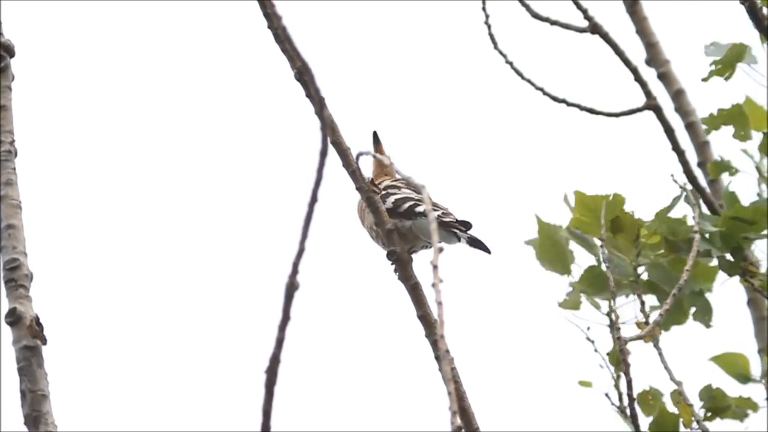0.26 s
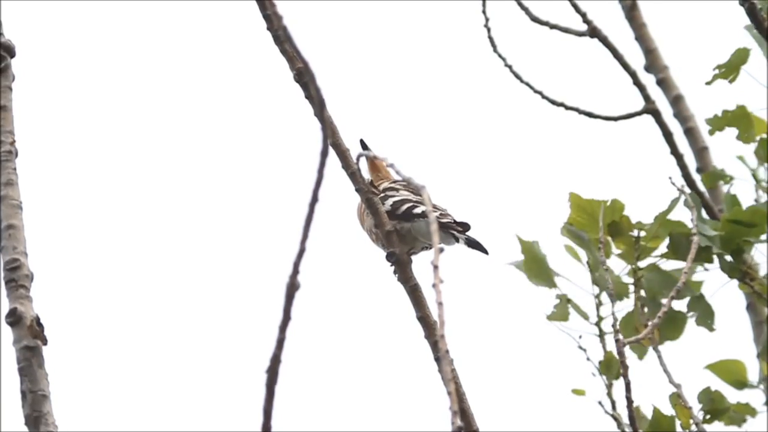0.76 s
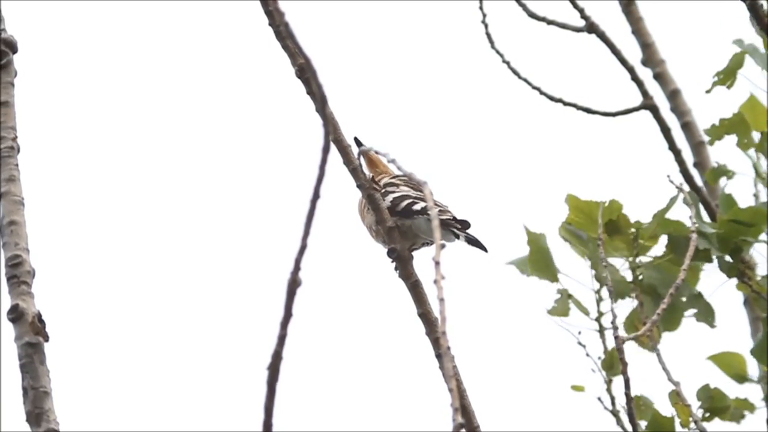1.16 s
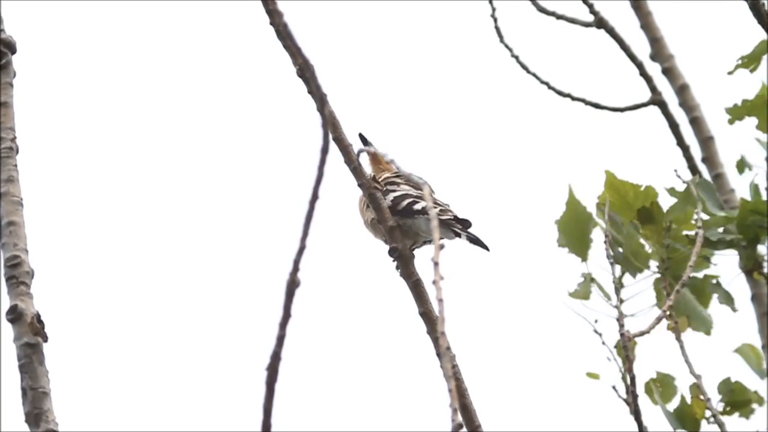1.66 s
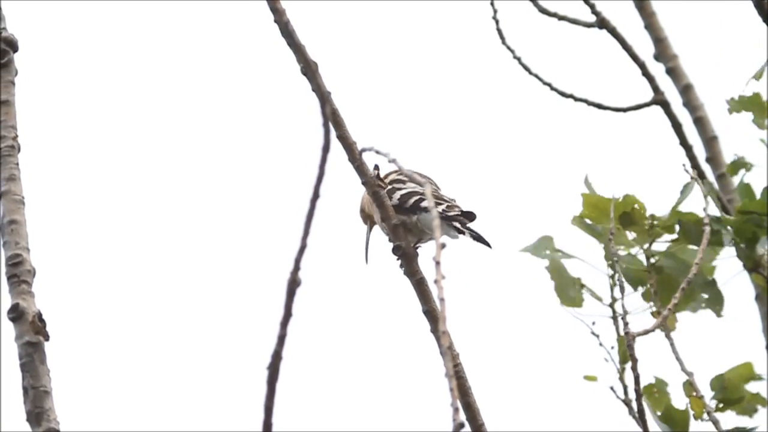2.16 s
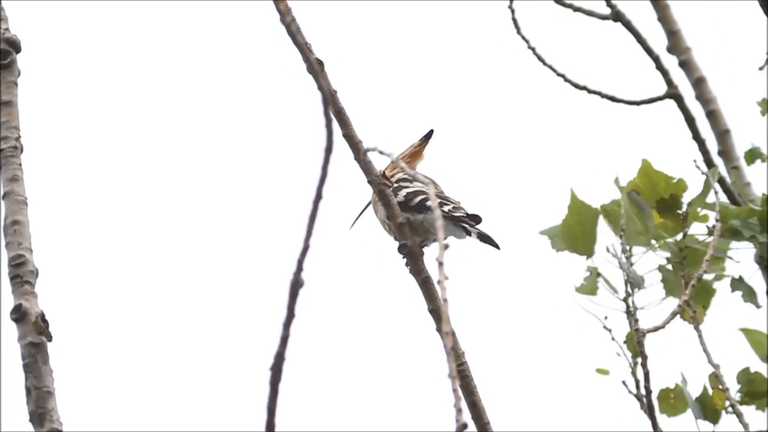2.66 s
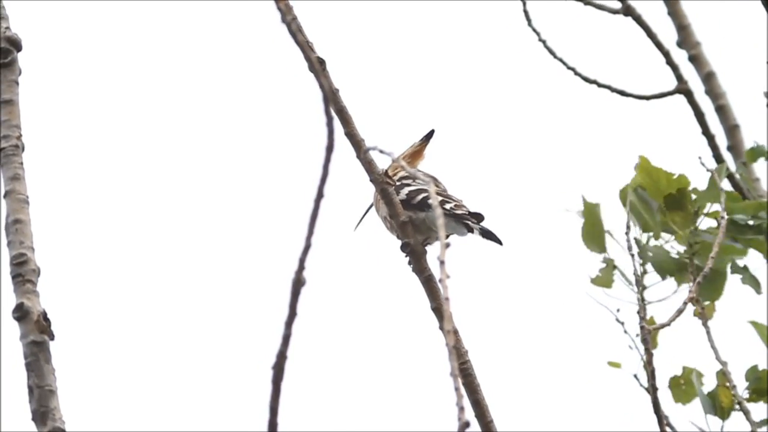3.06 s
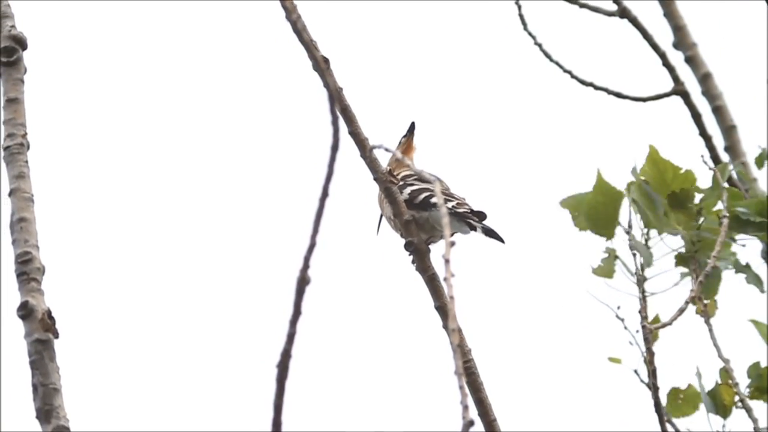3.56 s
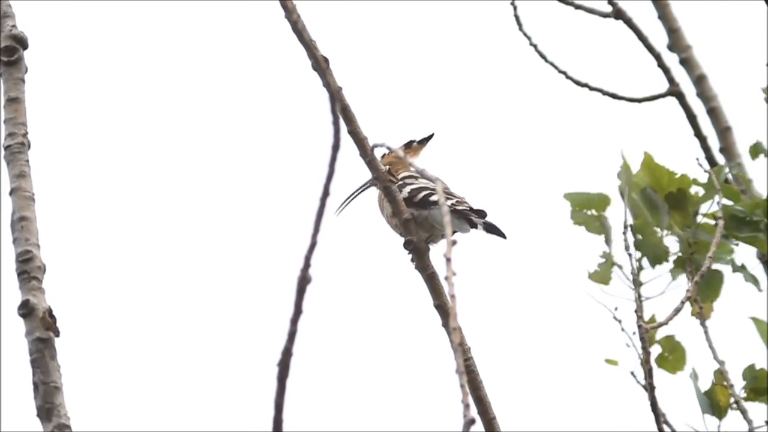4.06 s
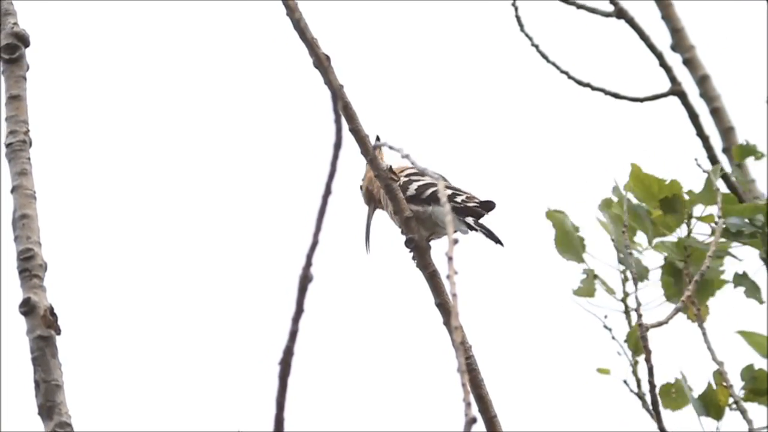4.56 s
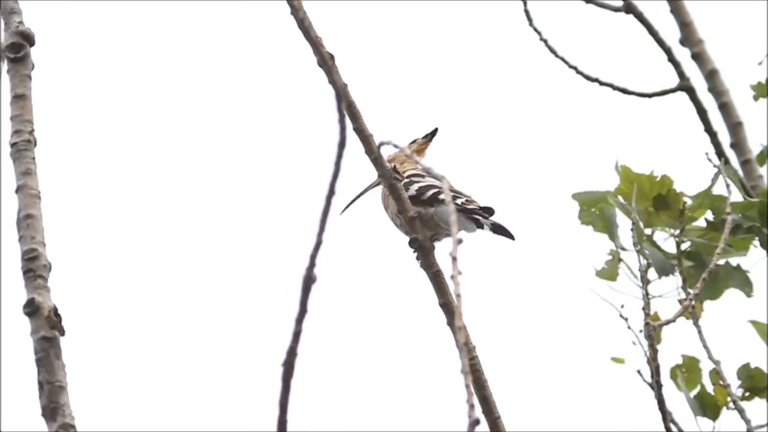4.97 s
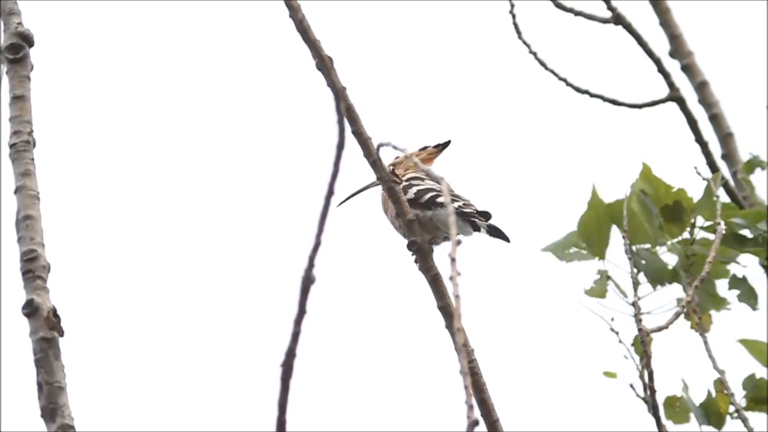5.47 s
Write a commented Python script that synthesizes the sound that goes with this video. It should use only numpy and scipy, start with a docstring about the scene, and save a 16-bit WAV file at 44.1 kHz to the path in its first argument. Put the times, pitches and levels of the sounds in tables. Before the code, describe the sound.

Soft hollow three-note hooting repeats twice outdoors among trilling, fluting and chirping birds, with faint hiss and far low rumble.

```python
"""A low traffic rumble and a faint hiss open the scene, with rough twitters and chirps far off in the trees.
A tit repeats a two-note song, a blackbird tries a few soft notes, and a small bird trills for over a second.
At two seconds a hoopoe on a branch gives three soft hoots, and three more follow later; between these calls
the blackbird flutes one phrase, and near the end a twig ticks once. Birds are trembling sines, the air is
shaped noise, the twig is damped sines; sparse decaying taps are the scatter of the trees at the microphone."""
import sys
import numpy as np
from scipy import signal
from scipy.fft import rfft, irfft
from scipy.io import wavfile
from scipy.ndimage import uniform_filter1d

SR = 44100
rng = np.random.default_rng(int(sys.argv[2]) if len(sys.argv) > 2 else 0)


def log_audio(samples):
    """Write samples as a 16-bit WAV file to the path given in sys.argv[1]."""
    # one column per channel
    frames = np.atleast_2d(samples).T
    # limit to full scale, then quantise
    limited = np.clip(frames, -1, 1)
    pcm = np.round(limited * 32767).astype(np.int16)
    wavfile.write(sys.argv[1], SR, pcm)


N = 251370  # length of the scene in samples

# Bird levels are those of the call itself, before its swell and the paths to the microphone.

# Spectrum of the far traffic and low air, relative: hz [Hz], level_db [dB per Hz]
RUMBLE_SPECTRUM = [(15, -31), (25, -21), (40, -11.5), (56, -3.5), (100, 0.5), (130, -2.5), (235, -7.5),
                   (300, -10.5), (390, -13.5), (700, -15), (1400, -18), (1820, -39), (3080, -120)]
# Spectrum of the hiss of leaves and far birds, relative: hz [Hz], level_db [dB per Hz]
HISS_SPECTRUM = [(900, -34), (1400, -2.5), (2000, -.5), (3000, 0), (4200, 1), (5200, -3), (6500, -6),
                 (9000, -8.5), (12500, -10), (15500, -16.5)]
RUMBLE_DB, HISS_DB = -56, -57  # rms at the microphone

# How long the trees hold each band: hz [Hz], t60_s [s]
TREE_DECAY = [(500, 0.61), (1500, 0.88), (4000, 0.76), (10000, 0.88)]

# Nearest rough twitters: start_s [s], length_s [s], level_db [dB], middle_pitch_hz [Hz],
# slide_hz [Hz], shake_hz [Hz, rms swing of the pitch]
ROUGH_TWITTERS = [(0, 0.1, -58, 3850, 0, 90), (.08, 0.6, -65, 2522, -10.5, 90),
                  (0.752, 0.087, -57, 3650, 332, 296), (0.789, 0.14, -56.5, 1770, 138, 158),
                  (2.228, 0.071, -58.5, 4240, -120, 80), (2.485, 0.09, -61, 2430, 70, 80),
                  (2.587, 0.07, -57.5, 2380, -310, 227), (2.721, .14, -56, 4830, -170, 230),
                  (2.746, 0.09, -61.5, 6330, -2, 497), (2.776, 0.13, -60, 3800, -300, 248),
                  (2.902, 0.071, -48, 2290, -170, 108), (3.099, 0.33, -55, 2495, 130, 75),
                  (3.483, 0.077, -48.5, 2830, -190, 109), (3.485, 0.092, -48.5, 2360, -580, 190),
                  (3.59, 0.1, -51, 3390, -400, 241), (3.828, .07, -64.5, 7530, 202, 170),
                  (4.402, 0.064, -63, 7500, 130, 200), (4.43, .065, -56.5, 3650, 2, 118),
                  (4.864, 0.12, -58.5, 3120, -165, 172), (4.98, 0.082, -61.5, 2374, 90, 101),
                  (5.158, 0.052, -53.5, 4680, 205, 121), (5.442, 0.16, -57.5, 3460, -300, 220),
                  (5.568, 0.048, -51, 2750, -100, 258), (5.642, 0.057, -52.5, 2950, 403, 280)]
# Chatter too faint to tell apart: from_s [s], to_s [s], rate [calls per s], level_db [dB],
# lowest_pitch_hz [Hz], highest_pitch_hz [Hz]
FAINT_CHATTER = [(0, 5.7, 2, -66, 2300, 4460), (3.03, 3.28, 20, -65.5, 7870, 13800)]
CHATTER_LENGTH_S, CHATTER_SHAKE_HZ = 0.061, 120  # mean length of a call; rms swing of its pitch
CHATTER_GLIDE = 0.0406  # furthest slide, as a share of the pitch
# Nearest clear chirps: start_s [s], length_s [s], level_db [dB], first_pitch_hz [Hz], last_pitch_hz [Hz]
CLEAR_CHIRPS = [(.635, 0.028, -48.5, 2554, 3520), (0.727, 0.02, -49.5, 2730, 3600),
                (1.216, 0.032, -49.5, 3545, 2257), (1.65, 0.029, -57, 3680, 2990),
                (2.467, 0.017, -54, 4500, 4530), (2.573, 0.025, -55.5, 2730, 3230),
                (2.707, 0.026, -49, 2770, 3150), (3.477, .08, -60.5, 5650, 4190),
                (3.777, 0.041, -55.5, 4590, 3970), (3.893, 0.059, -61, 5460, 4800),
                (3.996, 0.14, -56, 3150, 3060), (4.101, 0.08, -53, 3110, 3870),
                (4.588, .035, -53, 3330, 3700), (5.299, 0.044, -52, 3265, 3090)]

# The tit's two-note motif: drop_s [s, the fall to the low note], high_level_db [dB], low_level_db [dB],
# high_pitch_hz [Hz], low_pitch_hz [Hz]
TIT_SONG = [(0.303, -51, -48.5, 4220, 3800), (0.504, -51.5, -48.5, 4210, 3790),
            (4.054, -45.5, -40, 4230, 3755), (4.257, -41, -38, 4146, 3820), (4.626, -45, -38.5, 4220, 3854),
            (4.813, -43.5, -40, 4210, 3820), (5.179, -47.5, -50, 4190, 3820), (5.381, -49, -42, 4080, 3750)]
TIT_LEAD_S, TIT_HIGH_S, TIT_LOW_S = .065, 0.036, 0.047  # high note ahead of the drop; note lengths
TIT_RISE_HZ = 95  # climb of the low note

# The blackbird's short slurred notes: start_s [s], length_s [s], attack_s [s], release_s [s], level_db [dB],
# first_pitch_hz [Hz], turn_pitch_hz [Hz, at the end of the attack], last_pitch_hz [Hz]
SLURRED_NOTES = [(.275, 0.048, .015, 0.017, -62, 1750, 1756, 1840),
                 (0.446, 0.065, 0.02, .02, -60.5, 1954, 2044, 1950),
                 (0.517, 0.037, 0.016, 0.014, -53.5, 2000, 1900, 1620),
                 (0.562, 0.12, 0.042, 0.032, -54, 1500, 1635, 1505),
                 (2.728, 0.096, 0.051, 0.012, -48, 1990, 1957, 2050),
                 (2.807, 0.043, 0.012, 0.029, -42, 2015, 1910, 1850),
                 (2.875, 0.057, 0.033, 0.009, -50.5, 1830, 1684, 2040),
                 (2.89, 0.095, .045, 0.014, -43, 2635, 2133, 2150),
                 (3.002, 0.044, 0.0117, 0.0096, -46, 2300, 2154, 2145),
                 (3.027, 0.046, 0.024, 0.027, -26, 2156, 2070, 1934),
                 (3.266, 0.056, 0.0138, 0.02, -44.5, 1427, 1090, 1060),
                 (3.333, 0.055, 0.029, .012, -36.5, 1650, 1705, 1644),
                 (3.376, 0.096, .006, .016, -42.5, 1720, 1680, 1732),
                 (3.547, 0.14, 0.019, 0.035, -49.5, 1917, 1842, 1775)]
# The blackbird's one long note, with a lift near the end: time_s [s], level_db [dB], pitch_hz [Hz]
LONG_NOTE = [(3.104, -49, 1433), (3.118, -36, 1488), (3.158, -34.5, 1477), (3.218, -36, 1450),
             (3.238, -31.5, 1608), (3.25, -31.5, 1623), (3.258, -31.5, 1505), (3.268, -38, 1490)]
# The throat lets the octave through on low notes only
OCTAVE_DB, OCTAVE_BELOW_HZ, OCTAVE_DB_PER_HZ = -22.5, 1420, -0.0373

TRILL_START_S, TRILL_STEP_S = .737, .0937
TRILL_HZ, TRILL_SPREAD_HZ = 4660, 67  # mean and spread of the top of the upstrokes
TRILL_DB, TRILL_DB_PER_S = -52, 4  # mean level at the start; growth as it goes

# The hoopoe's hoots: start_s [s], length_s [s], level_db [dB], first_pitch_hz [Hz],
# last_pitch_hz [Hz, before the closing sag]
HOOPOE_HOOTS = [(2.014, 0.11, -33.5, 597, 605), (2.213, 0.11, -32.5, 586.6, 610.6),
                (2.421, 0.11, -33, 582.6, 614), (4.489, 0.11, -35, 598, 602.6),
                (4.689, 0.11, -33.7, 587, 602.4), (4.939, 0.111, -34.3, 582, 608)]
HOOT_RISE, HOOT_CUT = 0.76, 0.23  # shares of a hoot spent swelling and closing
HOOT_ONSET_DB, HOOT_END_DB = -27.5, -21  # where the swell starts from and where it closes to

# The twig's knock: peak_level_db [dB, knock alone], pitch_hz [Hz], width_hz [Hz]
TWIG_KNOCK = (-36.5, 1420, 780)
TICK_S = 5.1243
EDGE_HZ = 15720  # upper band limit of the recorder


def amp(db):
    """Decibels to gain."""
    return 10 ** (np.asarray(db) / 20)


def evened(x):
    """Scales to an rms of 1."""
    return x / np.sqrt(np.mean(x ** 2) + 1e-20)


def read(points, hz):
    """Reads a table of values over pitch along a log-frequency axis."""
    f, value = np.transpose(points)
    return np.interp(np.log(hz + 1), np.log(f + 1), value)


def add(mix, start_s, sound):
    """Mixes a sound in at its start time, cutting what runs past the end."""
    part = mix[max(round(start_s * SR), 0):][:len(sound)]
    part += sound[:len(part)]


def echo(x, delay):
    """The sound, arriving later by a longer path."""
    out = np.zeros(N)
    add(out, delay, x)
    return out


def trees(x, delay, build):
    """Scatter from trunks and leaves: sparse taps that build up, each band dying at its own speed."""
    spacing = 20  # samples: one tap falls at chance within each
    at = np.arange(0, SR - spacing, spacing)
    taps = np.zeros(SR)
    taps[at + rng.integers(0, spacing, len(at))] = rng.choice([-1., 1.], len(at))
    hz, t, bands = signal.stft(taps, SR, nperseg=256)
    decay = amp(-60 * t / read(TREE_DECAY, hz)[:, None])
    bands *= decay * (1 - np.exp(-t / build))
    tail = signal.istft(bands, SR, nperseg=256)[1]
    scattered = signal.fftconvolve(x, tail / np.linalg.norm(tail))[:N]
    return echo(scattered, delay)


def noise(spectrum):
    """Noise of rms 1 with the given spectrum."""
    gain = amp(read(spectrum, np.fft.rfftfreq(N, 1 / SR)))
    return evened(irfft(rfft(rng.standard_normal(N)) * gain, N))


def wander(size, rate_hz):
    """Smooth chance movement, low-passed softly around rate_hz; its whole run has rms 1."""
    run = 2 ** 15
    soft_edge = np.exp(-(np.fft.rfftfreq(run, 1 / SR) / rate_hz) ** 2)
    return evened(irfft(rfft(rng.standard_normal(run)) * soft_edge))[:size]


def whistle(hz, db, jitter, jitter_hz, overtone_db):
    """One side of a syrinx: a near sine whose pitch trembles, with a weak octave."""
    trembling_hz = hz * (1 + jitter * wander(len(hz), jitter_hz))
    phase = 2 * np.pi * np.cumsum(trembling_hz) / SR
    ends = signal.windows.tukey(len(hz), min(1, .004 * SR / len(hz)))  # 2 ms fades
    tone = np.sin(phase) + amp(overtone_db) * np.sin(2 * phase)
    return np.sqrt(2) * amp(db) * ends * tone


def contour(rows):
    """Pitch (slightly smoothed) and level for each sample of a note given as rows (s, Hz, dB)."""
    s, hz, db = np.transpose(rows)
    t = np.arange(s[0], max(s[-1], s[0] + .005), 1 / SR)
    return uniform_filter1d(np.interp(t, s, hz), size=120), np.interp(t, s, db)


def arch(length):
    """Progress 0-1 through a note, and a level in dB that rises and falls over it."""
    u = np.linspace(0, 1, int(length * SR))
    return u, 10 * np.log10(np.sin(np.pi * u) ** 2 + 1e-4) * 0.49


def gate(t, length, attack_s, release_s):
    """Gain of a note that swells, holds and closes."""
    rise = np.clip(t / attack_s, 0, 1)
    fall = np.clip((length - t) / release_s, 0, 1)
    return (np.sin(np.pi / 2 * rise) * np.sin(np.pi / 2 * fall)) ** 2


def background():
    """Far traffic and the even hiss of the open air: two steady shaped noises."""
    return amp(RUMBLE_DB) * noise(RUMBLE_SPECTRUM) + amp(HISS_DB) * noise(HISS_SPECTRUM)


def twitters():
    """Notes whose pitch shakes so fast that they blur into a narrow rasp."""
    out = np.zeros(N)
    for start_s, length, db, middle_hz, slide_hz, shake_hz in ROUGH_TWITTERS:
        u, swell = arch(length)
        hz = middle_hz + slide_hz * (u - .5)
        note = whistle(hz, db + swell, shake_hz / middle_hz, jitter_hz=347, overtone_db=-60)
        add(out, start_s, note)
    return out


def chatter():
    """Faint calls from deep in the foliage, at chance moments and pitches."""
    out = np.zeros(N)
    for start, end, rate, db, low_hz, high_hz in FAINT_CHATTER:
        slots = np.arange(start, end, 1 / rate)
        for slot_s, (late, pitch, slide, longer) in zip(slots, rng.random((64, 4))):
            u, swell = arch(CHATTER_LENGTH_S * (.5 + longer))
            glide = 1 + CHATTER_GLIDE * (2 * slide - 1) * u
            hz = low_hz * (high_hz / low_hz) ** pitch * glide
            call = whistle(hz, db + swell, CHATTER_SHAKE_HZ / hz, jitter_hz=339, overtone_db=-60)
            add(out, slot_s + .5 * late / rate, call)
    return out


def chirps():
    """Short clear notes that slide from one pitch to another."""
    out = np.zeros(N)
    for start_s, length, db, first_hz, last_hz in CLEAR_CHIRPS:
        u, swell = arch(length)
        hz = first_hz * (last_hz / first_hz) ** u
        add(out, start_s, whistle(hz, db + swell, jitter=0.014, jitter_hz=300, overtone_db=-60))
    return out


def far_birds():
    """Clear chirps and rough twitters, blurred by near reflections and the scatter of the trees."""
    clear, rough = chirps(), twitters() + chatter()
    both = amp(3) * clear + rough
    direct = amp(-0.5) * clear + amp(-0.5) * rough
    near_paths = amp(-16.5) * echo(both, 0.0067) + amp(-15.5) * echo(both, .017)
    scatter = trees(amp(-5.5) * clear + amp(-4) * rough, delay=.008, build=0.0046)
    return direct + near_paths + scatter


def tit():
    """A level note, a rough flick up and a drop to a lower one; the syrinx's other side joins faintly above."""
    out = np.zeros(N)
    for drop_s, high_db, low_db, high_hz, low_hz in TIT_SONG:
        u, swell = arch(TIT_HIGH_S)
        hz = high_hz * (1 + 0.017 * np.exp(-u / 0.083))  # settles from slightly sharp
        high_note = whistle(hz, high_db + swell, jitter=0.0051, jitter_hz=300, overtone_db=-35)
        add(out, drop_s - TIT_LEAD_S, high_note)

        u, swell = arch(0.0174)
        hz = low_hz * (1.1 + .32 * u)
        flick = whistle(hz, high_db - 8.5 + swell, jitter=0.035, jitter_hz=600, overtone_db=-40)
        add(out, drop_s - .015, flick)

        top_hz = low_hz + TIT_RISE_HZ
        drop = [(drop_s - .004, low_hz * 1.39, low_db - 16), (drop_s + 0.001, low_hz * 1.05, low_db - 2.5)]
        held = [(drop_s + 0.0062, low_hz, low_db),
                (drop_s + 0.69 * TIT_LOW_S, top_hz, low_db - 2.0),
                (drop_s + TIT_LOW_S, top_hz, low_db - 1.5)]
        low_note = whistle(*contour(drop + held), jitter=0.0071, jitter_hz=400, overtone_db=-51)
        add(out, drop[0][0], low_note)

        # two faint notes above the low one
        u, swell = arch(TIT_LOW_S)
        upper = whistle(4550 + 200 * u, low_db - 18.5 + swell, jitter=0.021, jitter_hz=400, overtone_db=-38)
        add(out, drop_s, upper)
        upmost = whistle(5300 + 150 * u, low_db - 23.5 + swell, jitter=0.054, jitter_hz=400, overtone_db=-42)
        add(out, drop_s + 0.0077, upmost)
    far = np.arange(N) < SR  # the first pair comes from deeper in the trees
    scatter = trees(out * (1 + 2.05 * far), delay=0.022, build=0.018)
    return out + amp(-8) * echo(out, 0.015) + amp(-12.5) * scatter


def flute(hz, db):
    """The blackbird's near sine, whose octave fades as the pitch rises."""
    octave_db = OCTAVE_DB + OCTAVE_DB_PER_HZ * np.maximum(hz - OCTAVE_BELOW_HZ, 0)
    return whistle(hz, db, jitter=0.011, jitter_hz=150, overtone_db=octave_db)


def blackbird():
    """Flute notes from further off, each turning in pitch at full voice, with a long wash from the trees."""
    out = np.zeros(N)
    for start_s, length, attack_s, release_s, db, first_hz, turn_hz, last_hz in SLURRED_NOTES:
        turn_s = min(attack_s, length)
        hz, level = contour([(0, first_hz, db), (turn_s, turn_hz, db), (length, last_hz, db)])
        breath = gate(np.arange(len(hz)) / SR, length, attack_s, release_s)
        add(out, start_s, breath * flute(hz, level))
    long_note = flute(*contour([(s, hz, db) for s, db, hz in LONG_NOTE]))
    add(out, LONG_NOTE[0][0], long_note)
    return out + amp(-12) * echo(out, .036) + amp(-10.0) * trees(out, delay=0.018, build=0.0044)


def trill(count=14):
    """Quick upstrokes, each with a higher, rougher answer that lingers in the trees; about ten a second."""
    strokes, answers = np.zeros(N), np.zeros(N)
    for elapsed in np.arange(count) * TRILL_STEP_S:
        late, louder, higher, steeper, sharper = rng.standard_normal(5)
        start_s = TRILL_START_S + elapsed
        db = TRILL_DB + TRILL_DB_PER_S * elapsed
        top_hz = TRILL_HZ + TRILL_SPREAD_HZ * sharper

        u, swell = arch(0.0203)
        climb = 0.118 * np.exp(0.46 * steeper)  # no two strokes rise alike
        hz = top_hz * (1 - climb * (1 - u) ** 2.57)
        stroke = whistle(hz, db + louder + swell, jitter=0.019, jitter_hz=400, overtone_db=-41)
        add(strokes, start_s, stroke)

        u, swell = arch(0.041)
        hz = 5030 + 60 * higher - 220 * u
        level = db - 7.5 + 1.2 * louder + swell
        answer = whistle(hz, level, jitter=0.034, jitter_hz=394, overtone_db=-38)
        add(answers, start_s + 0.022 + 0.004 * late, answer)
    direct = amp(-2) * strokes + amp(-1.5) * answers
    return direct + trees(amp(-8.5) * strokes + answers, delay=0.0102, build=0.0031)


def hoopoe():
    """Each hoot swells in the inflated throat, rises a little in pitch and is cut short; the trees answer it."""
    out = np.zeros(N)
    for start_s, length, db, first_hz, last_hz in HOOPOE_HOOTS:
        u = np.linspace(0, 1, int(length * SR))
        opening = HOOT_ONSET_DB * np.maximum(1 - u / HOOT_RISE, 0) ** 2.82
        closing = HOOT_END_DB * np.maximum(1 - (1 - u) / HOOT_CUT, 0) ** 3.4
        sag = 1 - 0.11 * np.exp((u - 1) / 0.047)  # the pitch falls as the pressure goes
        hz = (first_hz + (last_hz - first_hz) * u) * sag
        hoot = whistle(hz, db + opening + closing, jitter=0.0011, jitter_hz=80, overtone_db=-32.5)
        add(out, start_s, hoot)
    answer = amp(-17) * echo(out, .07)
    return out + answer + amp(-17) * trees(out, delay=.045, build=0.008)


def twig():
    """One dry tick: a heavily damped knock and a brief ring of the wood."""
    db, hz, width = TWIG_KNOCK
    t, out = np.arange(2000) / SR, np.zeros(N)
    damping = np.pi * width * t
    envelope = np.exp(-damping) * (damping * np.e / 2) ** 2  # peaks at 1
    knock = np.sin(2 * np.pi * hz * t) * envelope
    ring = amp(-2.5) * np.sin(2 * np.pi * 1250 * t) * amp(-60 * t / 0.03)
    add(out, TICK_S, amp(db) * (knock + ring))
    return out + amp(-19.0) * trees(out, delay=0.0037, build=0.0046)


def scene():
    """All sources at one microphone."""
    birds = far_birds() + tit() + blackbird() + trill() + hoopoe()
    return (background() + birds + twig())[None]


def record(dry):
    """The recorder's band limit: a steep low-pass."""
    low_pass = signal.firwin(1023, EDGE_HZ, window=("kaiser", 9), fs=SR)
    return signal.oaconvolve(dry, low_pass[None], "same", axes=1)


dry = scene()
out = record(dry)
log_audio(out)
```